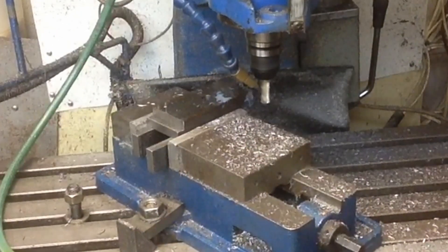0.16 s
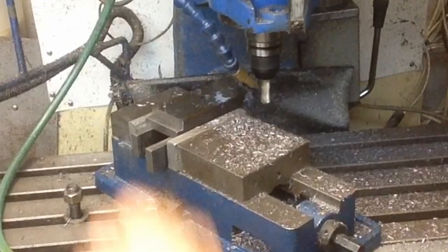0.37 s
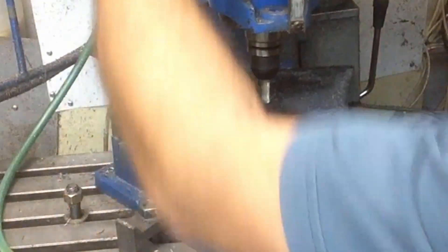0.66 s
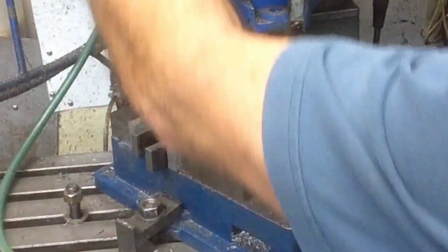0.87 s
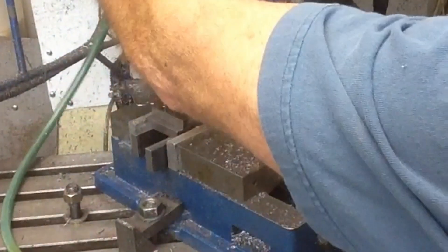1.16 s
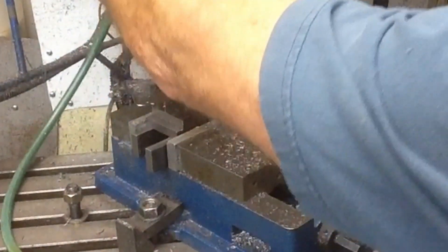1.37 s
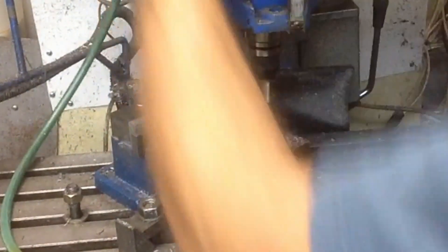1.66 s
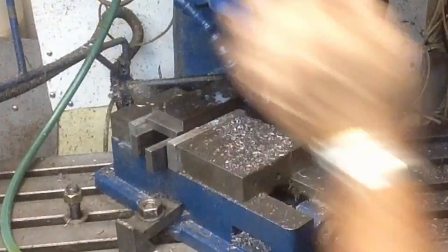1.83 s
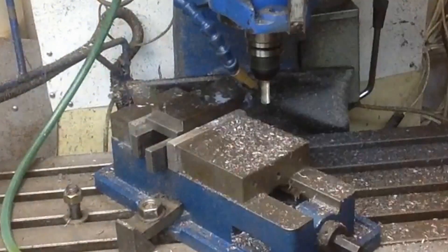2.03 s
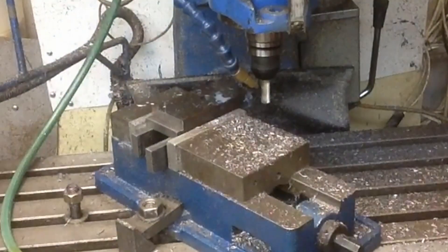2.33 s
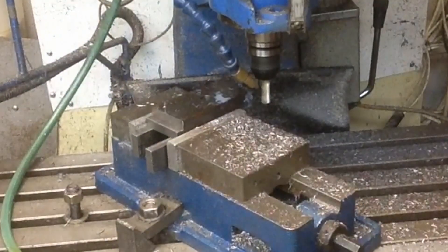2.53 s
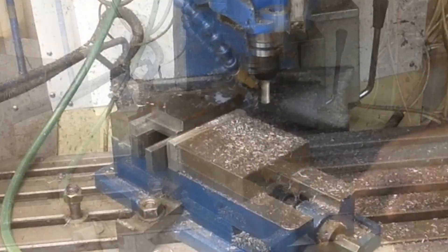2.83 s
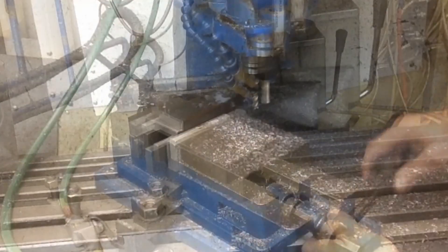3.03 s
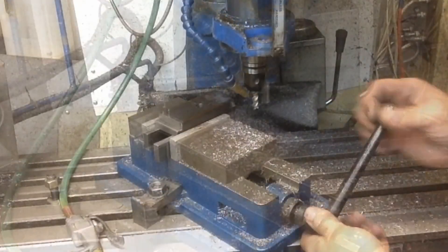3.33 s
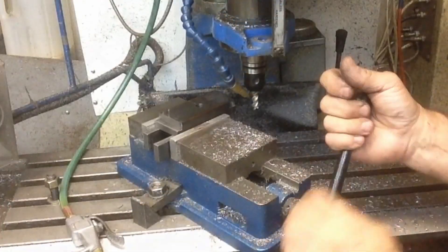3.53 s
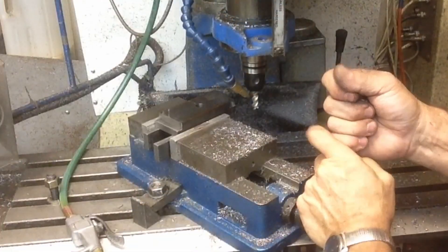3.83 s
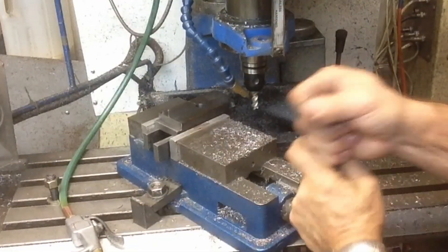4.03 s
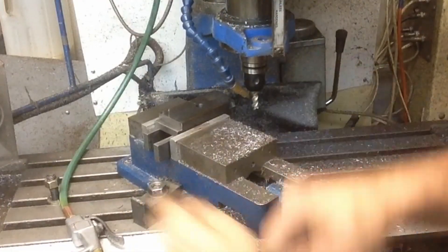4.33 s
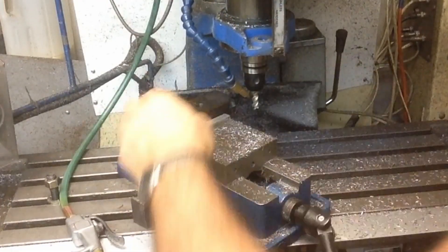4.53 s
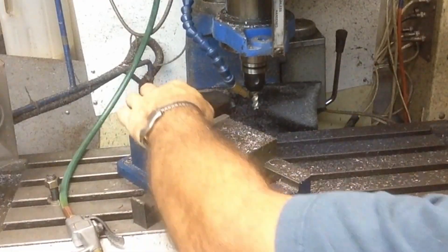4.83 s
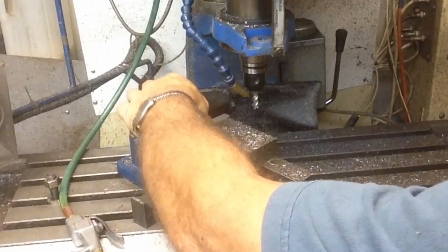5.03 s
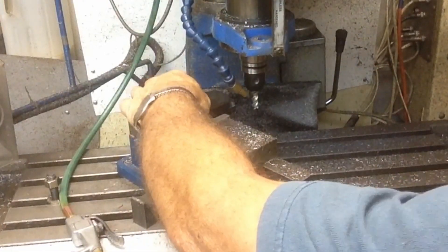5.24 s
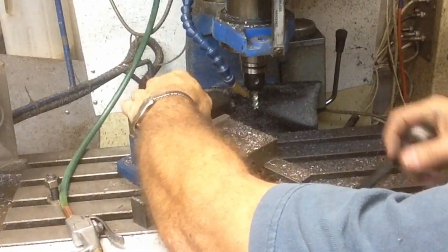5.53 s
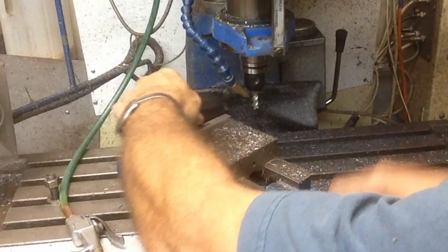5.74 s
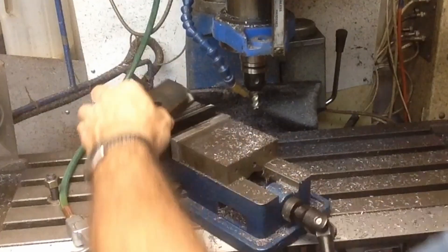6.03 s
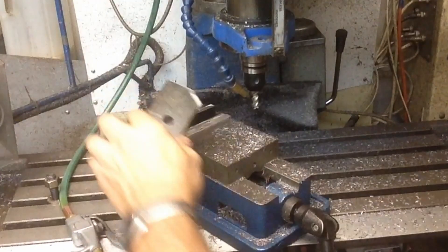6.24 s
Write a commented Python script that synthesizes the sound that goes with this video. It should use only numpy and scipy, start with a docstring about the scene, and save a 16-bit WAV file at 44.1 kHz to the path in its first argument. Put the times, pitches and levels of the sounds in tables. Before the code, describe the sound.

Loud machine drone and bright air hiss, the air cut, the drone stopping abruptly, a quick metallic wrench clatter, then quiet fan hum, dull knocks and a sharp tick.

```python
"""A vertical milling machine drones in a small workshop: shaken panels, a broad rush, hum and whine. Its air
jet, shaped noise with faint whistles, hisses, is turned down, eased up a little and shut. When the drone stops
short, a softer fan sound of noise and steady tones takes its place. A steel wrench scrapes along the vise screw
and clatters home, each blow ringing vise and wrench. Rubs and dull knocks are short noise bursts; the valve's
snap, light touches and one sharp tick ring small steel parts."""
import sys
import numpy as np
from scipy import signal
from scipy.fft import rfft, irfft, next_fast_len
from scipy.io import wavfile

SR = 44100
rng = np.random.default_rng(int(sys.argv[2]) if len(sys.argv) > 2 else 0)


def store_wav(level_fs):
    """Save 16-bit WAV to argv[1]."""
    pcm = np.round(np.clip(np.atleast_2d(level_fs), -1, 1) * 32767)
    wavfile.write(sys.argv[1], SR, pcm.T.astype(np.int16))


N = 281799
TIME = np.arange(N) / SR  # seconds

# In all tables, relative_db is a level that later steps scale; ring_s is the time to fade by 60 dB.
# Casting and guard resonances kept ringing by the drive: pitch_hz, width_hz, relative_db
PANEL_RESONANCES = [(124.6, 9.9, -28), (185.7, 17, -18.5), (252, 33, -5), (329.3, 57, -1.5),
                    (380, 21, -6.5), (482.3, 52, -3), (543, 34, -5.5), (615, 37, -1.5), (700.5, 29, -8),
                    (771.4, 23, -5), (858, 54, -6.5), (1008, 39, -12), (1052, 61, -2), (1256, 36, -6),
                    (1333, 103, -3), (1500, 24, -11.5), (2144, 300, -8.5), (2578, 91, -9.5),
                    (5830, 67, -10)]
# Colour of the drive's broad rush: pitch_hz, relative_db (per Hz)
RUSH_COLOUR = [(30, -48), (90, -42), (140, -13.5), (190, 2.5), (300, -4), (600, 2), (1400, 1), (1700, 1),
               (2800, 2), (4400, 0), (6000, 1), (9500, 1), (10300, -8.5), (12000, -7), (15000, -11.5)]
# Hum of the running drive: pitch_hz, relative_db, wander_hz
HUM_TONES = [(248.5, -62.7, 2.6), (280, -64.3, 1.2), (336, -72, 2.5), (366, -73, 2.5), (474, -73, 3),
             (615, -70, 5), (696, -75, 3), (877, -76, 3), (1248, -72, 4)]
# Small random swells in the level of the panels and hum: peak_s, rise_db
LEVEL_SWELLS = [(.59, 1.5), (.94, 3.5), (1.27, 3), (1.38, 3), (1.61, 2.5), (1.85, 1), (2.77, 0.5),
                (2.92, 3.5)]
# Thin, steady whine of the drive: pitch_hz, relative_db, wander_hz
WHINE_TONES = [(3848, -78, 5), (4049, -74, 3), (7998, -67.3, 3.5)]
# One part of the drive sings in spells: time_s, relative_db
SINGING_LEVEL = [(0, -78), (.65, -68), (.88, -60.5), (1.15, -62), (1.45, -72), (1.85, -58), (2.15, -76),
                 (2.4, -61), (2.65, -61), (2.92, -61), (3.1, -67)]
# The tone of that part: pitch_hz, relative_db, wander_hz
SINGING_TONE = [(774, -2, 5.5)]
# Flow of the air valve, open, turned down, then eased up a little: time_s, relative_db
AIR_FLOW = [(0, -46), (.56, -46), (.87, -51.5), (1.08, -52), (1.28, -49.5)]
# Colour of the air hiss: pitch_hz, relative_db (per Hz)
AIR_COLOUR = [(1500, -36), (2500, -12), (4000, -8.5), (7000, -5), (8200, 1), (9300, 0.5), (10200, -5),
              (11200, -1.5), (11700, 0.5), (13000, 1.5), (14300, 1), (15300, 0)]
# Faint whistles of the nozzle: pitch_hz, width_hz, relative_db
NOZZLE_WHISTLES = [(8230, 120, -17), (12750, 540, -13), (13450, 400, -18), (14400, 900, -15)]
# Pushes of the wrench along the screw: peak_s, relative_db
PUSHES = [(3.21, -61), (3.272, -50.5), (3.312, -45), (3.462, -55), (3.512, -59)]
# Wrench striking the vise screw:
# start_s, vise_relative_db, wrench_relative_db, wrench_pitch_hz, hardness_db_per_octave
BLOWS = [(3.288, -31.5, -34, 3710, -14), (3.297, -26.5, -36, 3610, -8), (3.3005, -34, -28.5, 4900, 1),
         (3.309, -28.5, -29.5, 4890, 3.5), (3.3165, -33.5, -32.5, 4930, 2), (3.327, -47, -39, 4910, 5),
         (3.3433, -49, -26.5, 4770, 1), (3.352, -48, -39, 4850, -2), (3.409, -49, -58, 4870, -4),
         (3.415, -53, -51, 4870, -2), (3.425, -43.5, -60, 4870, -4), (3.4435, -37.5, -36.5, 4850, 18),
         (3.446, -45, -32, 4797, 10), (3.448, -48, -35, 5130, -3), (3.455, -56, -38, 4860, 0)]
# Ringing of the wrench: multiple of its pitch, relative_db, ring_s
WRENCH_MODES = [(0.999, -1.5, 0.068), (1.027, -15, 0.074), (1.065, -13.5, 0.048), (1.75, -23.5, 0.043),
                (1.909, -18, 0.066), (1.985, -27, .05), (2.195, -21, 0.029), (2.6, -34, .03)]
# Ringing of the vise and block: pitch_hz, relative_db, ring_s
VISE_MODES = [(335, -24, 0.64), (452, -12, 0.21), (677, -22, 0.22), (753, -15, 0.22), (1035, -11, 0.11),
              (1096, -12, .1), (1310, -20, 0.12), (1365, 0, 0.13), (1464, -13, 0.16), (1810, -11, 0.13),
              (1780, -9, 0.13), (2277, -17, .14), (2430, -5, 0.069), (2950, -18, .11), (3110, 0, 0.07),
              (3330, -17, 0.071), (3650, -9, 0.051), (6100, -16, .06)]
# Colour of the vise's dense, short-lived modes: pitch_hz, relative_db (per Hz)
VISE_BODY_COLOUR = [(120, -33), (300, -24), (900, -2), (1500, 16.5), (2200, 8), (2700, 7), (3600, 5),
                    (4400, -6), (6500, -0.5), (8000, -14), (15000, -30)]
# Hands rubbing on valve and handle: start_s, relative_db, centre_hz, half_width_octaves
RUBS = [(.49, -52, 2400, .4), (.535, -53, 2250, 0.29), (.725, -51.5, 2940, 0.057), (.85, -54, 2450, .4),
        (1.57, -60, 2200, .12), (1.8, -59, 2080, 0.18), (1.925, -57, 2150, 0.24), (2.65, -52.5, 2870, .1),
        (2.675, -56, 2920, .35)]
# Damped knocks: the air valve shutting at 1.347 s, then hands and wrench on vise and table:
# start_s, relative_db, centre_hz, half_width_octaves
KNOCKS = [(1.347, -48, 3200, .6), (1.923, -52, 1210, .6), (3.314, -44, 460, .7), (3.454, -48, 400, .6),
          (4.468, -52, 1120, .3), (4.476, -52.5, 520, .7), (5.801, -50, 540, .6), (5.82, -55.5, 1150, .35),
          (5.826, -53, 600, .6), (5.848, -56, 520, .6), (6.338, -55, 760, .7)]
# Short metal pings: the air valve snapping shut at 1.351 s, then small parts touched lightly: start_s,
# relative_db, pitch_hz
PINGS = [(1.351, -44, 2800), (6.341, -53, 3350), (6.364, -54, 3400)]
# A light steel piece touches and bounces: start_s, snap_relative_db, ring_relative_db
TICKS = [(6.2679, -21.5, -38), (6.2695, -22.5, -25), (6.2752, -35, -38)]
# Ringing of that light piece: pitch_hz, relative_db, ring_s
TICK_MODES = [(1600, -24, .015), (2140, -11, .014), (2480, -6, 0.01), (2630, -21, .11), (3220, -23, 0.1),
              (3370, -25, .2), (4010, -22, .07), (4130, -26, .2), (4690, -21, .05), (5200, -20, .04),
              (7410, -25, .05)]
# Colour of fans and workshop air: pitch_hz, relative_db (per Hz)
FAN_COLOUR = [(30, -33), (70, -19), (100, -12), (130, 0), (190, 14), (410, 14), (520, 4.5), (760, 6.5),
              (950, 0), (1600, -1.5), (3000, 2), (4300, 2.5), (7000, 5), (15000, 1.5)]
# Fan housing resonances: pitch_hz, width_hz, relative_db
FAN_HOUSING = [(1220, 370, -22), (1822, 65, -4), (2000, 38, -7), (2220, 53, -1.5), (2298, 64, -5),
               (2477, 190, -1.5), (2640, 81, -7), (5240, 320, -2.5), (7280, 230, -1.5), (9270, 830, 3)]
# Steady fan tones: pitch_hz, level_db, wander_hz
FAN_TONES = [(295, -70.5, 1.5), (337, -66.8, 0.9), (781, -69.7, 1.8)]

DRONE_END_S, AIR_END_S = 3.112, 1.362
# The machine runs evenly, its level wavering a little
DRONE_DB, WAVER_DB, WAVER_HZ = -53.5, 0.14, 5.1
# Midway the body and hum sag once and recover, the hum more
SAG_S, SAG_WIDTH_S, DRONE_SAG_DB, HUM_SAG_DB = 1.43, 0.33, 0.5, 9
SWELL_WIDTH_S = 0.03
HUM_DB, FLUTTER_DB = -0.3, 1.8  # flutter is the unsteadiness of the hum and singing
WHINE_DB, WHINE_START_S, WHINE_RISE_S = 2, 0.47, 0.3
PUSH_RISE_DB_PER_S, PUSH_FALL_DB_PER_S = 250, 260
SLIP_SPREAD_DB = 2.2  # unevenness of the scrape
ROCKING_SHARE = .005  # waver of the wrench's pitch as it rocks, as a share of the pitch
# Small touches after the last blow
SETTLE_GAP_S, SETTLE_DB, SETTLE_HZ, SETTLE_HARDNESS = .014, -57, 5100, 7
RUB_T60_S, KNOCK_T60_S = 0.24, 0.084
CUTOFF_HZ = 15250


def machine(panel_db, rush_db, throb_db):
    """The drive shakes the panels over a broad rush that throbs a little; hum, singing and whine join."""
    swells = np.prod([bump(s, SWELL_WIDTH_S, db) for s, db in LEVEL_SWELLS], axis=0)
    panels = from_db(panel_db) * swells * resonances(PANEL_RESONANCES)
    rush = from_db(rush_db) * noise(RUSH_COLOUR)
    strength = from_db(DRONE_DB + WAVER_DB * drift(WAVER_HZ))
    strength = strength * bump(SAG_S, SAG_WIDTH_S, -DRONE_SAG_DB)
    throb = from_db(throb_db * drift(42))
    body = workshop(strength * throb * (panels + rush), t60=0.16, wet_db=-10.5)
    hum_strength = from_db(HUM_DB) * swells * bump(SAG_S, SAG_WIDTH_S, -HUM_SAG_DB)
    hum = hum_strength * tones(HUM_TONES, flutter_db=FLUTTER_DB)
    singing = level(SINGING_LEVEL) * tones(SINGING_TONE, flutter_db=FLUTTER_DB)
    whine_rise = np.clip((TIME - WHINE_START_S) / WHINE_RISE_S, 0, 1)
    whine = from_db(WHINE_DB) * whine_rise * tones(WHINE_TONES, flutter_db=2.0)
    return body + hum + singing + whine


def air_jet(sputter_db):
    """Bright hiss from the nozzle with faint whistles; its strength follows the valve's flow."""
    sputter = from_db(sputter_db * drift(30))
    hiss = level(AIR_FLOW) * sputter * (noise(AIR_COLOUR) + resonances(NOZZLE_WHISTLES))
    return workshop(hiss, t60=0.11, wet_db=-7.5) * until(AIR_END_S)


def slide(grain_db, ring_db):
    """Steel scrapes on steel in uneven little slips that ring the vise; each push swells and falls away."""
    push = 0
    for s, db in PUSHES:
        drop_db = np.maximum(PUSH_RISE_DB_PER_S * (s - TIME), PUSH_FALL_DB_PER_S * (TIME - s))
        push = push + from_db(db - drop_db)
    rasp = noise([(200, 2), (400, 8), (900, 6.5), (1600, 15.0), (2400, 0.0), (4000, 3), (10000, -13)])
    slips = push * rms_one(rasp * from_db(grain_db * drift(150)))
    ringing = sum(from_db(db) * ring(slips, hz, t60) for hz, db, t60 in VISE_MODES)
    return slips + from_db(ring_db) * ringing


def clatter():
    """Contacts of wrench and screw, as rows like BLOWS: the blows, then four small settling touches."""
    touches = BLOWS[-1][0] + SETTLE_GAP_S * np.cumsum(rng.uniform(.7, 1.3, size=4))
    pitches = SETTLE_HZ * (1 + .04 * rng.standard_normal(len(touches)))
    settling = [(s, SETTLE_DB, SETTLE_DB, hz, SETTLE_HARDNESS) for s, hz in zip(touches, pitches)]
    return BLOWS + settling


def wrench(contacts, crack_db, crack_t60, rise_s, wobble):
    """The steel socket clinks; its pitch shifts with its seat and rocking. Hard contacts ring brighter."""
    out, age = np.zeros(N), TIME[:SR // 4]
    onset = 1 - np.exp(-age / rise_s)
    rocking = 1 + wobble * drift(74)
    for s, vise_db, db, hz, hardness in contacts:
        span = slice(round(s * SR), round(s * SR) + len(age))
        turns = np.cumsum(hz * rocking[span]) / SR
        for multiple, mode_db, t60 in WRENCH_MODES:
            strength = from_db(db + mode_db + hardness * np.log2(multiple) - 60 * age / t60)
            out[span] += onset * strength * np.sin(2 * np.pi * (multiple * turns + rng.random()))
    strikes = clicks([(s, db + hardness / 2) for s, vise_db, db, hz, hardness in contacts])
    crack = noise([(1000, -16), (5000, 5.0), (7500, -2.5), (10000, -10), (15000, -11)])
    return out + from_db(crack_db) * dying(strikes, crack_t60) * crack


def vise(contacts, mode_db, body_db, body_t60, chatter_db):
    """Every blow rings the vise's modes with new strengths, over a noise burst of dense short ones."""
    modes = 0
    for hz, db, t60 in VISE_MODES:
        blows = [(s, blow_db + db + 2 * rng.standard_normal()) for s, blow_db, *rest in contacts]
        modes = modes + ring(clicks(blows), hz, t60)
    chatter = rms_one(from_db(chatter_db * drift(300)))
    burst = dying(clicks(contacts), body_t60) * chatter * noise(VISE_BODY_COLOUR)
    return from_db(mode_db) * modes + from_db(body_db) * burst


def handling(rows, t60, softness):
    """Damped knocks and rubs are bands of noise that swell in and die away; softness slows the swell."""
    out = 0
    for s, db, hz, octaves in rows:
        low_hz, high_hz = hz / 2 ** octaves, min(hz * 2 ** octaves, CUTOFF_HZ)
        lag = np.exp(-1 / (softness * t60 * SR))
        swell = signal.lfilter([1 - lag], [1, -lag], dying(clicks([(s, db)]), t60))
        out = out + swell * rms_one(band_pass(rng.standard_normal(N), low_hz, high_hz))
    return out


def pings(t60):
    """Each ping, from the valve snapping shut or a light touch of a metal part, rings one short note."""
    return sum(ring(clicks([(s, db)]), hz, t60) for s, db, hz in PINGS)


def tick(snap_db, low_hz, high_hz, ring_db):
    """Hard, tiny contacts: dry snaps, with a bounce that sets the piece ringing briefly."""
    snap = band_pass(clicks(TICKS), low_hz, high_hz)
    touch = clicks([(s, db) for s, snap_level, db in TICKS])
    ringing = 0
    for k, (hz, db, t60) in enumerate(TICK_MODES):
        ringing = ringing + (-1) ** k * from_db(db) * ring(touch, hz, t60)  # signs alternate
    return from_db(snap_db) * snap + from_db(ring_db) * ringing


def fans(air_db, duct_db):
    """Even air noise with housing resonances and blade tones."""
    air = from_db(air_db) * noise(FAN_COLOUR) + from_db(duct_db) * resonances(FAN_HOUSING)
    return workshop(air, t60=0.096, wet_db=-9.0) + tones(FAN_TONES, flutter_db=1.0)


def workshop(x, t60, wet_db):
    """Dense reflections from guards and nearby walls; they also ripple the colour of steady noise."""
    age = TIME[:SR // 2]
    tail = noise([(200, -8), (1200, -3), (3000, 0), (14000, 0)])[:len(age)]
    tail = tail * from_db(-60 * age / t60) * (age > .003)  # the first echo comes after 3 ms
    return x + from_db(wet_db) * signal.fftconvolve(x, tail / np.linalg.norm(tail))[:N]


def radiated(x, low_hz):
    """Small steel parts radiate almost no bass."""
    return signal.sosfilt(signal.butter(4, low_hz, "high", fs=SR, output="sos"), x)


def band_pass(x, low_hz, high_hz):
    """Keep mainly the sound between two pitches."""
    return signal.sosfilt(signal.butter(2, [low_hz, high_hz], "band", fs=SR, output="sos"), x)


def from_db(db):
    """Decibels to gain."""
    return 10 ** (np.asarray(db) / 20)


def rms_one(x):
    """Scale to an average strength (rms) of 1."""
    return x / np.sqrt(np.mean(x ** 2) + 1e-20)


def level(rows):
    """Gain over time, drawn through (time_s, level_db) rows."""
    return from_db(np.interp(TIME, *np.transpose(rows)))


def until(end_s):
    """Gain of one that falls to zero in 5 ms around the given time."""
    return np.clip((end_s - TIME) * 200 + .5, 0, 1)


def bump(s, width_s, db):
    """Gain that leaves unity smoothly, reaches db at the given time and returns."""
    return from_db(db * np.exp(-.5 * ((TIME - s) / width_s) ** 2))


def drift(rate):
    """Smooth random wandering of spread 1; a higher rate (Hz) wanders faster."""
    r = np.exp(-80 * np.pi * rate / SR)
    # Made at every 40th sample; the first 2000 values let the filter settle
    slow = signal.lfilter([1], [1, -2 * r, r * r], rng.standard_normal(N // 40 + 2002))[2000:]
    return np.interp(np.arange(N) / 40, np.arange(len(slow)), rms_one(slow))


def noise(spectrum):
    """Noise with the given colour from (pitch_hz, relative_db) rows, rms 1."""
    size = next_fast_len(N, real=True)
    hz, db = np.transpose(spectrum)
    gain = from_db(np.interp(np.log(np.fft.rfftfreq(size, 1 / SR) + 1), np.log(hz), db))
    return rms_one(irfft(rfft(rng.standard_normal(size)) * gain, size)[:N])


def resonances(rows):
    """Each resonance is shaken at random; two filter stages keep the valleys between them quiet."""
    out = 0
    for hz, width, db in rows:
        b, a = signal.iirpeak(hz, hz / (1.48 * width), fs=SR)
        once = signal.lfilter(b, a, rng.standard_normal(N))
        out = out + from_db(db) * rms_one(signal.lfilter(b, a, once))
    return out


def tones(rows, flutter_db):
    """Rotating parts sing with slightly unsteady speed and strength."""
    out = 0
    for hz, db, wander in rows:
        strength = from_db(db + flutter_db * drift(4.7)) * np.sqrt(2)  # levels are rms
        turns = np.cumsum(hz + wander * drift(6.47)) / SR
        out = out + strength * np.sin(2 * np.pi * turns)
    return out


def clicks(rows):
    """One single-sample click for each (start_s, level_db, ..) row."""
    out = np.zeros(N)
    for s, db, *rest in rows:
        out[round(s * SR)] += from_db(db)
    return out


def ring(drive, hz, t60):
    """A unit click sets a fading sine of starting height 1 ringing."""
    r, w = from_db(-60 / (t60 * SR)), 2 * np.pi * hz / SR
    return signal.lfilter([0, np.sin(w)], [1, -2 * r * np.cos(w), r * r], drive + 1e-18)


def dying(drive, t60):
    """Envelope that jumps at each click and dies away; energies add."""
    energy = signal.lfilter([1], [1, -from_db(-120 / (t60 * SR))], drive ** 2 + 1e-24)
    return np.sqrt(energy)


def scene():
    """Machine, then fans, with the air jet and handwork on top; the same in both channels."""
    running = until(DRONE_END_S)
    steady = running * machine(panel_db=-7.5, rush_db=0.48, throb_db=.5)
    steady = steady + (1 - running) * fans(air_db=-53.5, duct_db=-69)
    contacts = clatter()
    clank = vise(contacts, mode_db=-9.0, body_db=-5.5, body_t60=0.066, chatter_db=0)
    clank = clank + wrench(contacts, crack_db=-14.5, crack_t60=0.04, rise_s=0.00081, wobble=ROCKING_SHARE)
    clank = clank + slide(grain_db=SLIP_SPREAD_DB, ring_db=-58)
    hands = handling(RUBS, RUB_T60_S, softness=0.0074) + handling(KNOCKS, KNOCK_T60_S, softness=0.032)
    small = hands + pings(t60=0.021) + tick(snap_db=4.5, low_hz=1650, high_hz=5000, ring_db=-8.5)
    handwork = workshop(radiated(clank + small, low_hz=253), t60=0.13, wet_db=-10.5)
    mono = steady + air_jet(sputter_db=1.0) + handwork
    return np.array([mono, mono])


def record(dry):
    """The treble above the cutoff is removed steeply."""
    return signal.sosfilt(signal.ellip(12, .1, 70, CUTOFF_HZ, fs=SR, output="sos"), dry)


dry = scene()
out = record(dry)
store_wav(out)
```